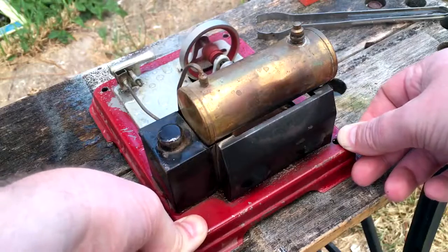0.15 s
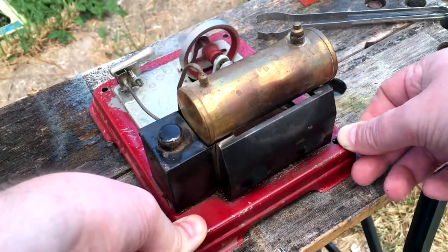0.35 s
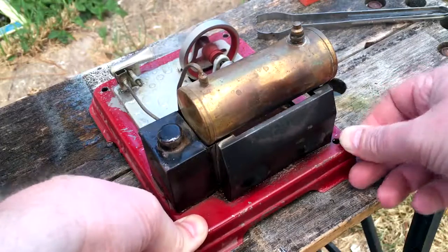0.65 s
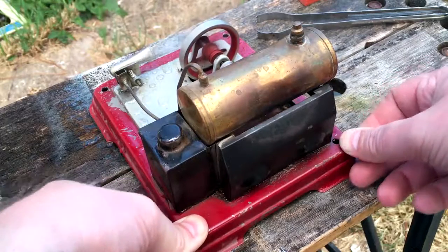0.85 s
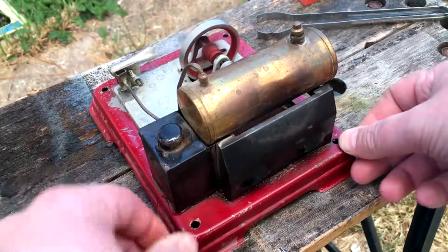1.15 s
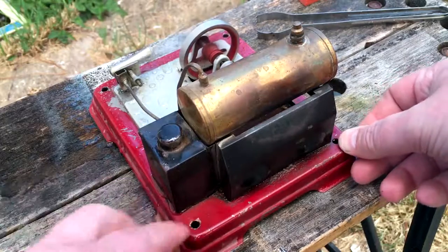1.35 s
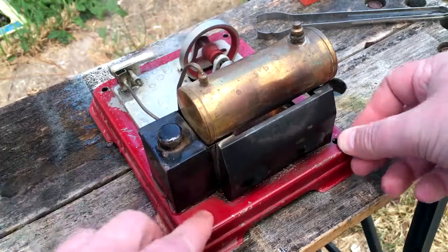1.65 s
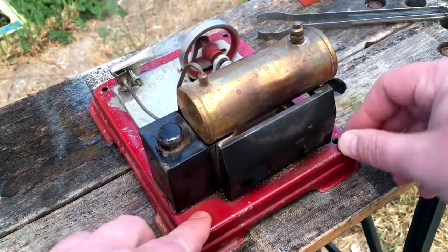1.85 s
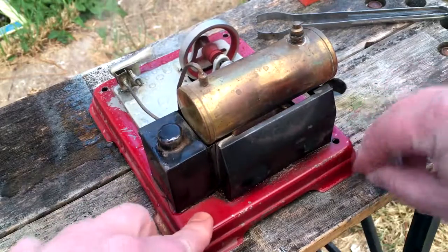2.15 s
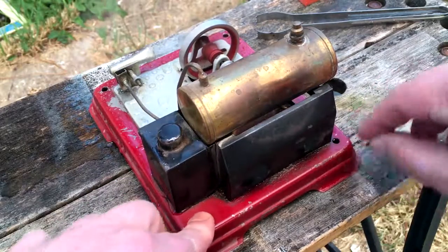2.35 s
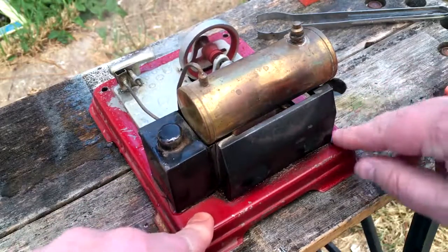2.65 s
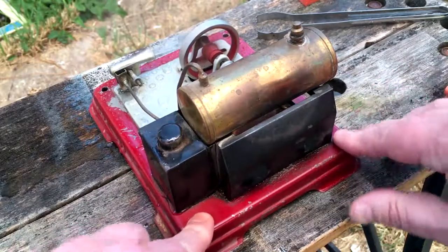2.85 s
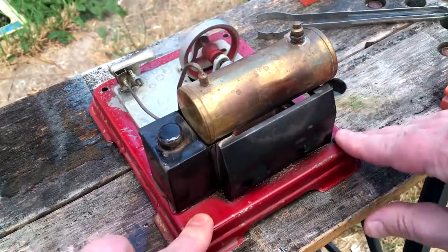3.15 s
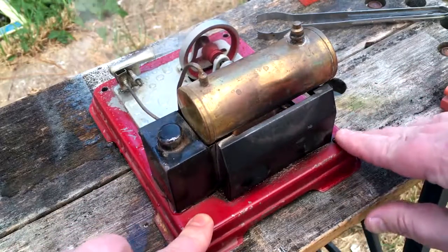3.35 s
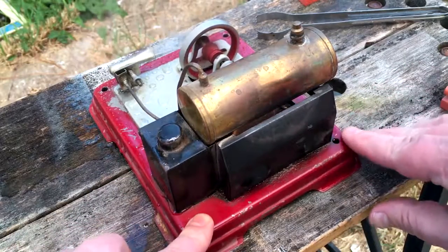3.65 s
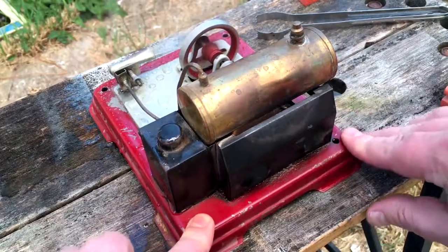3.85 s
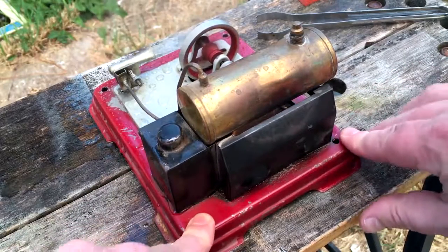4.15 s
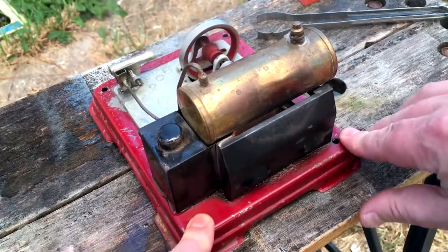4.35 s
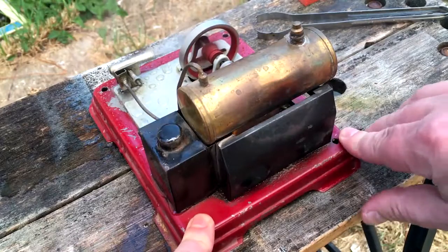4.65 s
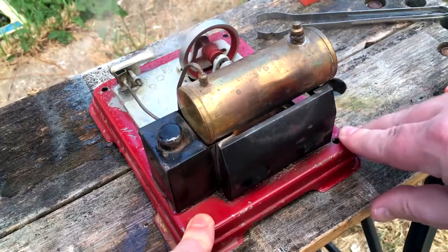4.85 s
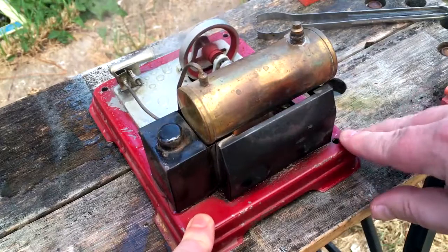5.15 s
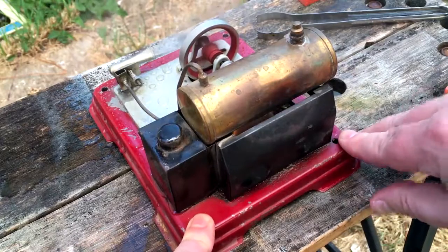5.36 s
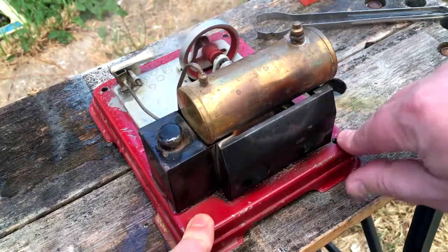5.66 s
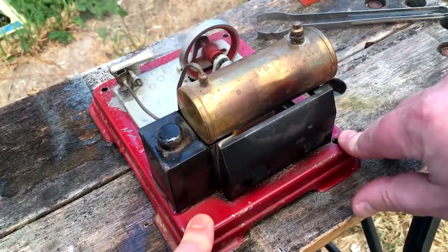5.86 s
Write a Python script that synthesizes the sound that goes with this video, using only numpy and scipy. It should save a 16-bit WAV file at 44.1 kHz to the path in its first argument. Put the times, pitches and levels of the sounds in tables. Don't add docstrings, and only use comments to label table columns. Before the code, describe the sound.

A small toy steam engine runs fast on a wooden bench outdoors, a tinny metallic rattle at about twenty beats a second, close up.

```python
import sys
import numpy as np
from scipy import signal
from scipy.fft import rfft, irfft
from scipy.io import wavfile
from scipy.ndimage import uniform_filter1d

SR = 44100
rng = np.random.default_rng(int(sys.argv[2]) if len(sys.argv) > 2 else 0)


def transcribe(signal):
    frames = np.atleast_2d(signal).T
    limited = np.clip(frames, -1, 1)
    pcm = np.round(limited * 32767).astype(np.int16)
    wavfile.write(sys.argv[1], SR, pcm)


def field_ratio(decibels):
    return 10 ** (np.asarray(decibels, dtype=float) / 20)


N = 264600
T = np.arange(N) / SR


def level(x, db):
    return x * field_ratio(db) / np.sqrt(np.mean(x ** 2, axis=-1, keepdims=True))


def ring(modes, size):
    f = np.arange(size // 2 + 1) * SR / size
    rows = []
    for k, (hz, width_hz, db) in enumerate(modes):
        damping = 1j * f * width_hz
        rows.append((-1) ** k * field_ratio(db) * damping / (hz ** 2 - f ** 2 + damping))
    return np.array(rows)


def body(modes):
    return ring(modes, size=N).sum(axis=0)


def filtered(x, response):
    return irfft(rfft(x) * response, len(x))


def walk(rate):
    hold = int(SR / rate)
    steps = np.repeat(rng.standard_normal(N // hold + 1), hold)
    return 0.9 * uniform_filter1d(uniform_filter1d(steps, hold), hold)[:N]


def around(turn, angle, width):
    away = (turn - angle + .5) % 1 - .5
    return np.exp(-.5 * (away / width) ** 2)


def contact(x, low_hz=800, high_hz=7000):
    return signal.sosfilt(signal.butter(2, [low_hz, high_hz], "band", fs=SR, output="sos"), x)


def wind():
    return level(filtered(rng.standard_normal(N), body([(49, 100, 0)]) ** 2), 0)


# (t/s, level/dB, f/Hz)
THUDS = [
    (.165, -33, 52),
    (.315, -42, 69),
    (.44, -36, 50),
    (.525, -43, 60),
    (2.049, -38, 160),
    (2.05, -42, 96),
    (2.395, -48, 85),
]


def bumps(t60_s=0.13, rise_s=0.014):
    out = 0
    for s, db, hz in THUDS:
        t = np.clip(T - s, 0, None)
        shape = (1 - np.exp(-t / rise_s)) * field_ratio(-60 * t / t60_s)
        out = out + field_ratio(db) * np.sin(2 * np.pi * hz * t) * shape * 2.1
    return out


# (multiple of its speed, level/dB)
SHAFT_TONES = [(2, -70), (4, -60), (5, -67), (7, -66), (8, -60), (11, -61), (14, -63), (16, -58), (18, -60)]


def hum(turn):
    out = 0
    for multiple, db in SHAFT_TONES:
        phase = 2 * np.pi * (multiple * turn + rng.random())
        out = out + field_ratio(db + 2.8 * walk(2.95)) * np.sin(phase)
    return out


# (angle/turns, level/dB)
CRANK_PUSHES = [
    (.06, -1),
    (-.15, -4),
    (-.33, -8),
    (.4, -6.5),
]
# (f/Hz, width/Hz, level/dB)
BENCH_MODES = [(85, 17, -13.5), (160, 21, -4), (218, 23, -10.5), (369, 67, -1), (538, 106, 3.5),
               (659, 146, 1)]
# (f/Hz, width/Hz, level/dB)
PLANK_MODE = [(305, 70, 0)]


def thump(turn, bench_db, plank_db, scatter_db=2.5, slip_turns=0.0059, rumble_db=4.0):
    push, whole = np.zeros(N), np.arange(1, int(turn[-1]))
    for angle, db in CRANK_PUSHES:
        late, louder = rng.standard_normal((len(whole), 2)).T
        at = np.interp(whole + angle + slip_turns * late, turn, np.arange(N)).astype(int)
        push[at] += field_ratio(db + scatter_db * louder)
    plank = level(filtered(push, body(PLANK_MODE) ** 2), 0)
    zero, pole = np.exp(-2 * np.pi * 350 / SR), np.exp(-2 * np.pi * 900 / SR)
    loose = signal.lfilter([1, -zero], [1, -pole], rng.standard_normal(N))
    push = level(push, 0) + field_ratio(rumble_db + 3.3 * walk(30)) * loose
    bench = level(filtered(push, body(BENCH_MODES)), 0)
    return field_ratio(bench_db) * bench + field_ratio(plank_db) * plank


# (f/Hz, level/dB per Hz)
STEAM_COLOUR = [(500, 4.5), (1500, 7), (4000, -1), (5500, -0.5), (7000, -9.5), (9000, -14), (11500, -13),
                (13000, -24), (16000, -37)]


def steam(turn):
    hz, db = np.transpose(STEAM_COLOUR)
    f = np.arange(N // 2 + 1) * SR / N
    colour = field_ratio(np.interp(np.log(f + 1), np.log(hz), db))
    leak = field_ratio(-14)
    puff = leak + around(turn, 0.34, 0.07) + field_ratio(-7.5) * around(turn, 0.046, 0.079)
    hiss = filtered(rng.standard_normal(N), colour)
    return level(hiss * puff * field_ratio(2.5 * walk(30)), -42.5)


# (angle/turns, width/turns, level/dB)
LOOSE_PLAY = [(-0.053, 0.11, -3.5), (-0.15, 0.064, 2.5), (-0.289, 0.24, 0), (0.41, 0.051, -6),
              (0.088, 0.22, -5.5)]
# (f/Hz, width/Hz, level/dB)
BASE_MODES = [(1018.7, 116, -2.5), (1117, 90.5, 3), (1196, 89.4, 1.5), (1787, 140, -11.5)]
# (f/Hz, width/Hz, level/dB)
EDGE_MODES = [(1245, 91.4, -3.5), (1389.5, 80, 1.5), (1469, 77.3, 0)]
# (f/Hz, width/Hz, level/dB)
FIREBOX_MODES = [(2092, 92, -12.5), (2344, 57, -5), (2749, 118, -8.5), (2945, 81, 0.5), (3044, 75, 0.5),
                 (3278, 81.4, -4.5), (3558, 138, -15)]
# (f/Hz, width/Hz, level/dB)
BRASS_MODES = [(4090, 194, -3), (4316, 310, -2.5), (4560, 176, -5), (5190, 495, -14), (5990, 690, -18.5)]


def chatter(turn, edge_db, ticks_per_s=2500, spread_db=3.0, box_db=-1, brass_db=-14):
    size = field_ratio(spread_db * np.minimum(rng.exponential(size=N), 3.5))
    ticks = (rng.random(N) < ticks_per_s / SR) * rng.choice([-1, 1], N) * size
    looseness = field_ratio(-8)
    for angle, width, db in LOOSE_PLAY:
        looseness = looseness + field_ratio(db) * around(turn, angle, width)
    ticks = ticks * looseness * field_ratio(1.9 * walk(45))
    tin = filtered(ticks, body(BASE_MODES)) - field_ratio(edge_db) * filtered(ticks, body(EDGE_MODES))
    rest = field_ratio(box_db) * body(FIREBOX_MODES) + field_ratio(brass_db) * body(BRASS_MODES)
    return level(contact(tin + filtered(ticks, rest)), 0)


# (t/s, base level/dB, firebox minus base level/dB, brass minus base level/dB)
CRANK_KNOCKS = [(0.038, -19, 0.5, -29), (0.083, -15.5, -5, -22), (0.125, -20, -2, -28),
                (0.17, -16, -4, -29), (0.216, -19.5, 2.5, -29), (0.26, -19, -6, -18),
                (0.303, -17, -0.5, -31), (0.348, -13.5, -4.5, -25), (0.394, -23.5, 5.5, -25),
                (0.44, -17.5, 0, -18), (0.481, -13.5, -2.5, -20), (0.527, -15.5, -5, -14),
                (0.615, -20, -2.5, -10.5), (0.66, -15.5, -4.5, -10), (0.705, -19, -1, -20),
                (0.754, -12.5, -7.5, -16), (0.796, -19, -3.5, -13), (0.845, -22, 6, -16),
                (0.888, -23, 8, -21), (0.935, -19.5, -3, -26), (0.981, -20, -5, -24),
                (1.028, -15.5, -12, -36), (1.073, -26, 7.5, -8), (1.118, -21, 1, -12.5),
                (1.162, -15.5, -12, -29), (1.211, -14.5, -18, -20), (1.301, -18.5, 0, -16),
                (1.347, -24.5, 2, -14), (1.396, -17, -1, -14), (1.487, -16, -5, -22),
                (1.533, -18.5, -3.5, -22), (1.582, -20.5, -7, -12.5), (1.626, -26, 5.5, -8.5),
                (1.679, -24.5, 4.5, -8.5), (1.722, -20.5, -6, -23), (1.768, -20, 0, -13),
                (1.823, -20.5, 4, -18), (1.864, -21.5, 1, -14.5), (1.919, -20.5, 0, -21),
                (1.962, -30, 9, -10.5), (2.004, -20.5, -1, -20), (2.057, -19.5, 1.5, -17.5),
                (2.103, -21.5, -8.5, -11.5), (2.152, -25, 5, -7), (2.196, -18, -3.5, -16),
                (2.246, -20.5, -6, -13.5), (2.293, -20, -2, -15), (2.343, -23, -1.5, -8),
                (2.384, -25.5, 4.5, -4), (2.442, -22, 5, -13.5), (2.483, -22, -0.5, -8.5),
                (2.54, -18, -3.5, -20), (2.592, -24.5, 2, -16), (2.637, -30.5, 11.5, -5),
                (2.692, -23, 1.5, -12), (2.74, -25, 4, -12), (2.794, -23.5, -1, -15), (2.842, -28, 7, -18),
                (2.892, -19.5, 1.5, -23), (2.932, -28, 7, -3.5), (2.992, -21, -0.5, -15),
                (3.03, -20.5, 1.5, -13), (3.09, -23.5, 4, -6.5), (3.141, -19.5, 1, -22),
                (3.19, -24.5, 5.5, -14), (3.24, -21.5, -4, -21), (3.289, -21.5, -2.5, -15),
                (3.333, -22, 0, -8), (3.393, -29, 5.5, -11), (3.434, -25.5, 4.5, -9),
                (3.489, -33, 9.5, -11.5), (3.544, -20, -5, -29), (3.593, -31, 7, -14),
                (3.643, -29.5, 10, -15), (3.693, -23, 2, -17), (3.741, -33.5, 10, -9),
                (3.791, -29.5, 5.5, -6), (3.84, -30, 11.5, -12), (3.893, -17.5, -7, -31),
                (3.942, -20.5, 0, -23), (3.992, -24, 1, -20), (4.041, -22, 6, -18), (4.082, -22, 3, -15),
                (4.138, -26.5, 5, -5.5), (4.187, -23.5, 1, -19), (4.237, -21, 2.5, -14.5),
                (4.279, -30, 12.5, -1), (4.337, -21.5, 2.5, -16), (4.377, -26, 5, -6),
                (4.434, -21, -2.5, -9.5), (4.484, -24, 2, -17), (4.535, -19.5, -1, -16),
                (4.582, -23.5, 3.5, -12.5), (4.632, -20.5, -1.5, -11), (4.679, -23.5, 3.5, -19),
                (4.729, -24, 2.5, -8), (4.78, -23, -4, -17), (4.836, -20, -2.5, -21), (4.878, -24, 2, -26),
                (4.928, -22, -5, -9), (4.978, -24, 1.5, -11), (5.03, -16.5, -7, -18),
                (5.068, -26.5, 6.5, -10.5), (5.127, -25, 2.5, -12.5), (5.178, -25, 7.5, -13),
                (5.221, -25.5, 6.5, -9.5), (5.277, -21.5, 2.5, -19), (5.328, -31.5, 13, -7),
                (5.379, -28, 8.5, -18), (5.43, -20, -2, -13), (5.473, -34, 9, -9), (5.529, -19, 2, -13.5),
                (5.578, -23.5, 0.5, -16), (5.628, -24, 7.5, -21), (5.68, -20.5, -5, -12.5),
                (5.778, -20.5, 2.5, -26), (5.827, -28.5, 7.5, -6), (5.875, -30.5, 10.5, -16),
                (5.926, -25.5, 2.5, -16), (5.976, -30.5, 13.5, -6)]
# (t/s, base level/dB, firebox minus base level/dB, brass minus base level/dB)
PISTON_SLAPS = [(0.023, -37, 2, -17), (0.055, -37, 4, -8), (0.066, -26.5, 6, -14), (0.112, -23, 1, -22),
                (0.144, -34, 8, -18), (0.154, -23, 2, -18.5), (0.198, -31, 9.5, -14), (0.244, -34, 9, -17),
                (0.287, -34, 8, -7), (0.333, -29, 5, -10), (0.377, -28.5, 8, -9), (0.422, -25, 2, -15),
                (0.466, -26, 2, -10), (0.508, -27.5, -12, -14), (0.54, -28, -13, -13.5),
                (0.552, -23.5, 3.5, -8), (0.572, -37, -3, -15), (0.599, -22, -8, -20.5),
                (0.645, -25, -3, -26), (0.688, -25, 4, -10), (0.736, -26, 1, -14), (0.768, -29, -1, -16),
                (0.826, -29, 2, -15), (0.86, -40, 11, 1), (0.917, -32, 6, -14), (0.961, -34, 7, -13.5),
                (1.008, -29, 1.5, -11), (1.055, -32, 10.5, -8.5), (1.102, -27, -7, -20),
                (1.238, -29, 10, -4), (1.256, -29.5, 7.5, -4), (1.328, -32, 10.5, -8),
                (1.421, -22, 5.5, -9), (1.436, -37, 14, -13), (1.47, -27, -16, -23), (1.516, -34, 10, -4),
                (1.565, -28, 3, -18), (1.612, -28, 7, -10), (1.659, -33, -5, -21), (1.703, -32, 3.5, -14),
                (1.905, -24.5, -5, -10), (1.989, -31, 2, -11), (2.025, -34, 6, -12),
                (2.14, -22.5, -1.5, -12), (2.375, -26, 5, -7), (2.712, -26, -2, -13), (2.811, -38, 12, -6),
                (2.822, -25, -10, -25), (2.833, -30, 5.5, -13), (2.913, -26, -4, -15),
                (2.923, -25, -13, -18), (2.941, -25, -1.5, -15), (3.012, -25.5, 3.5, -14),
                (3.169, -32, -5, -21), (3.224, -23.5, 1, -15), (3.323, -33, -4, -26), (3.34, -28, 6, -14.5),
                (3.362, -30, -8, -14), (3.449, -25, -3.5, -10.5), (3.465, -28, -8, -15),
                (3.575, -26, -9, -18), (3.611, -35, -4, -8), (3.705, -33, -6, -7), (3.826, -30, -11, -16),
                (3.863, -40, -1, -7), (3.872, -26, -14, -27), (3.912, -33, -4, -11), (4.064, -36, 8, -1.5),
                (4.089, -22.5, 3, -23), (4.131, -36, 14, -0.5), (4.172, -34, 10, -14),
                (4.218, -35, -17, -24), (4.262, -26, 3, -19), (4.355, -30, -7, -12),
                (4.368, -23.5, 1.5, -15), (4.467, -22, 1, -21), (4.55, -30, 4.5, -8),
                (4.66, -20.5, -13, -26), (4.749, -23, -10, -14), (4.77, -27, 3, -18),
                (4.813, -28, -11, -23), (4.907, -24.5, -2, -24), (5.06, -27, 5.5, -5.5), (5.21, -35, 5, -7),
                (5.231, -21.5, -5, -23), (5.464, -23, -6, -20), (5.56, -26, -6, -19), (5.6, -33, -2, -9),
                (5.701, -27, 1, -17), (5.712, -18.5, -5, -22), (5.726, -30, 8, -6), (5.751, -40, 11, -10),
                (5.771, -26, 3, -6.5), (5.846, -34, 2.5, -9), (5.858, -30, -4, -21), (5.909, -38, -14, -24),
                (5.997, -38, 0, -4)]


def knocks(edge_db, rise_s=.002, fall_s=.002, lag_s=.0016, jump_s=0.0018, jingle_s=0.0056,
           scatter_db=1.0, size=4096):
    s, base_db, box_db, brass_db = np.transpose(CRANK_KNOCKS + PISTON_SLAPS)
    count, lead = len(s), size // 8
    t = (np.arange(size) - lead) / SR + lag_s
    burst = rng.standard_normal((count, size)) * rng.random((count, size))
    hard_db = np.clip(brass_db - np.maximum(box_db, 0) + 17, -4, 9)[:, None]
    hard = field_ratio(.8 * hard_db)
    upper = .5 * hard_db * np.clip((np.array(FIREBOX_MODES)[:, 0] - 3100) / 200, 0, 1)
    heavy = burst * np.exp(-.5 * (t / np.where(t < 0, rise_s / hard, fall_s * hard)) ** 2)
    after = t + jump_s
    light = burst * np.exp(np.where(after < 0, after / 0.00031, -after / jingle_s))
    edge = np.repeat(np.interp(s, T, edge_db)[:, None], len(EDGE_MODES), axis=1)
    free = np.hstack([np.zeros((count, len(BASE_MODES))), edge])
    parts = [(BASE_MODES + EDGE_MODES, heavy, free, base_db),
             (FIREBOX_MODES, heavy, upper, base_db + box_db),
             (BRASS_MODES, light, 0, base_db + brass_db)]
    total = 0
    for modes, blow, extra_db, db in parts:
        share = field_ratio(scatter_db * rng.standard_normal((count, len(modes))) + extra_db)
        sound = irfft(rfft(blow) * (share @ ring(modes, size=size)), size)
        peak = np.sqrt(np.mean(sound[:, lead - 200:lead + 200] ** 2, axis=1))
        total = total + sound * (field_ratio(db - 4.0) / peak)[:, None]
    late = np.argmax(uniform_filter1d(total ** 2, size=130, axis=1), axis=1) - lead
    start = np.clip((s * SR).astype(int) - late, 0, N)
    out = np.zeros(N + size + 1)
    np.add.at(out, start[:, None] + np.arange(size), total)
    return contact(out[lead:lead + N])


# (t/s, position/turns)
CRANK_TURNS = [(0.0, 0.2), (0.3, 6.93), (0.6, 13.68), (0.9, 20.26), (1.2, 26.81), (1.5, 33.3), (1.8, 39.62),
               (2.1, 45.97), (2.4, 52.2), (2.7, 58.24), (3.0, 64.25), (3.3, 70.23), (3.6, 76.2),
               (3.9, 82.23), (4.2, 88.3), (4.5, 94.37), (4.8, 100.44), (5.1, 106.5), (5.4, 112.47),
               (5.7, 118.49), (6.0, 124.5)]
# (t/s, chatter level/dB, free edge level/dB, thump level/dB,
# plank boom level/dB, wind level/dB, firebox lid level/dB, hum level/dB)
GRIP = [
    (0, -27.5, -4, -42.5, -46.5, -58, -3, -3),
    (.55, -27, -5, -42.5, -46, -53, 0, -4),
    (.75, -28, -5, -42, -49, -71, 1, -2),
    (1.55, -29.5, -4.5, -42, -50, -80, 3.5, -5),
    (1.75, -28, -10.5, -43, -52, -78, 7, -7),
    (2.3, -28.5, -8, -43.5, -53.5, -68, 1.5, 0.7),
    (4.4, -29, -6.5, -44.5, -53.5, -70, 2.5, -1),
    (6, -29, -7, -43, -53.5, -66, -1, 2),
]
# (f/Hz, width/Hz, level change/dB)
PANEL_BALANCE = [(449, 65, -7.5), (820, 290, 1.5), (1576, 120, -1.5), (2020, 59, -0.5), (2400, 154, -7),
                 (3794, 53, 9.5), (10160, 1300, -7)]


def scene():
    turn = uniform_filter1d(np.interp(T, *np.transpose(CRANK_TURNS)), SR // 10)
    s, *columns = np.transpose(GRIP)
    curves = [np.interp(T, s, column) for column in columns]
    chatter_db, edge_db, thump_db, plank_db, wind_db, lid_db, hum_db = curves
    edge_db = edge_db - edge_db.mean()
    engine = field_ratio(hum_db) * hum(turn) + thump(turn, thump_db, plank_db) + steam(turn)
    engine = engine + field_ratio(chatter_db - 0.5) * chatter(turn, edge_db) + knocks(edge_db)
    engine = engine + (field_ratio(lid_db) - 1) * filtered(engine, body([(2340, 120, 0)]))
    f = np.arange(N // 2 + 1) * SR / N
    for hz, width_hz, db in PANEL_BALANCE:
        stiff, damping = hz ** 2 - f ** 2, 1j * f * width_hz
        engine = filtered(engine, (stiff + damping * field_ratio(db)) / (stiff + damping))
    return (engine + field_ratio(wind_db) * wind() + bumps())[None]


def low_pass(x):
    return signal.sosfilt(signal.butter(12, 15900, fs=SR, output="sos"), x)


def record(dry):
    mix = signal.sosfilt(signal.butter(2, 50, "high", fs=SR, output="sos"), dry)
    mix = signal.sosfilt(signal.ellip(8, .2, 60, 15750, fs=SR, output="sos"), mix)
    return low_pass(mix)


dry = scene()
out = record(dry)
transcribe(out)
```